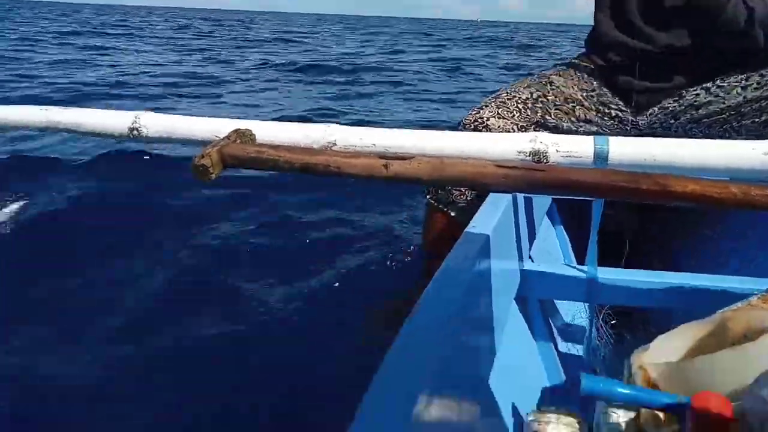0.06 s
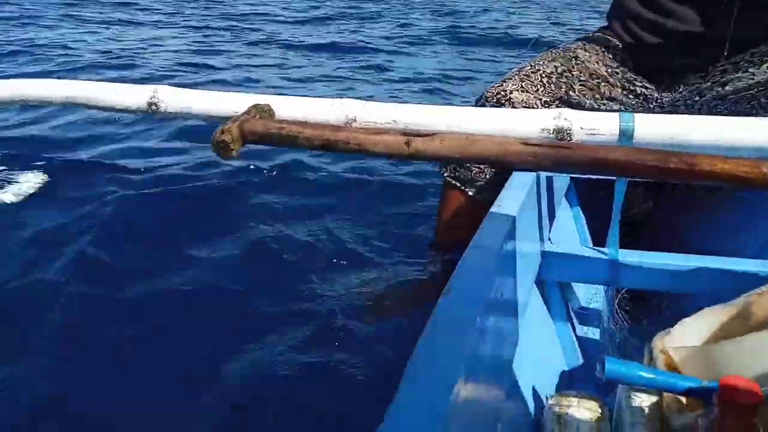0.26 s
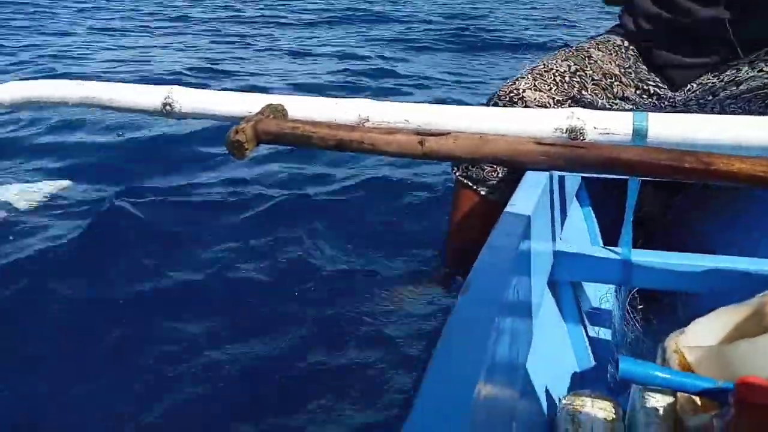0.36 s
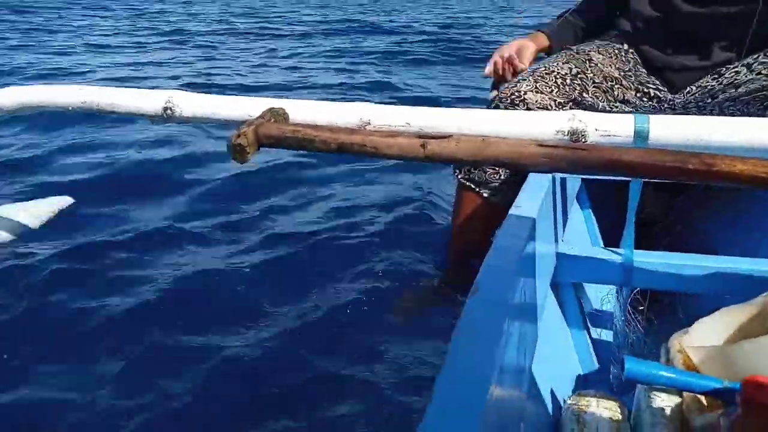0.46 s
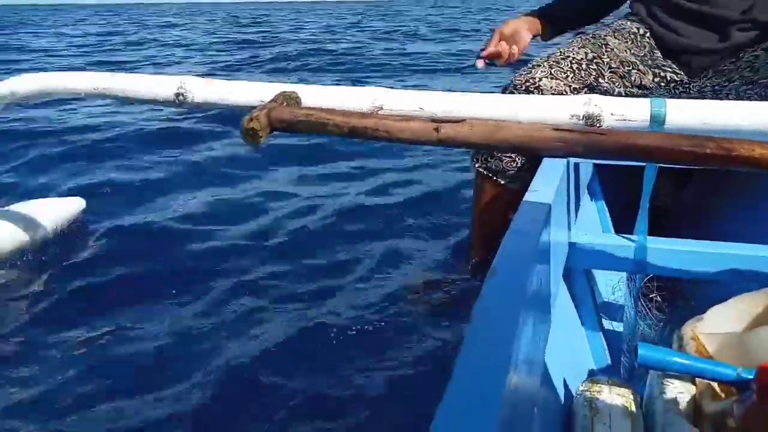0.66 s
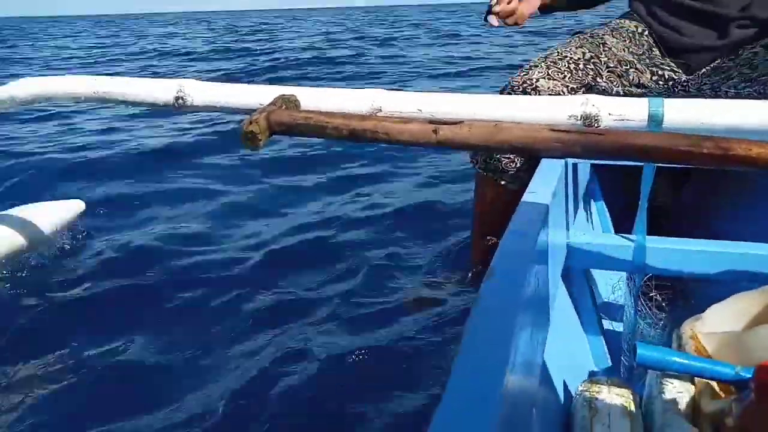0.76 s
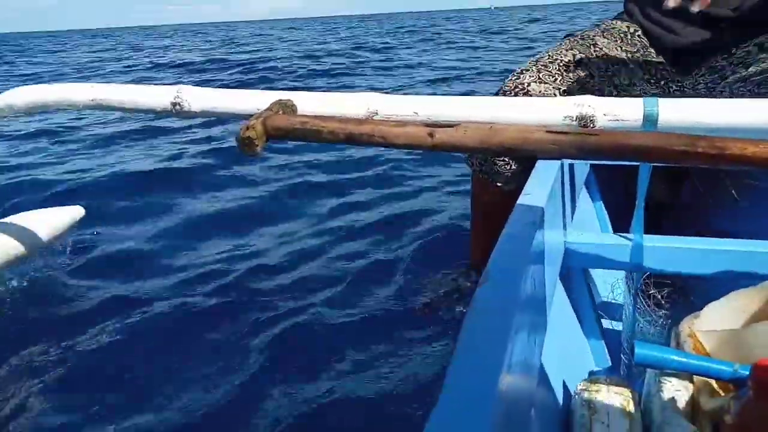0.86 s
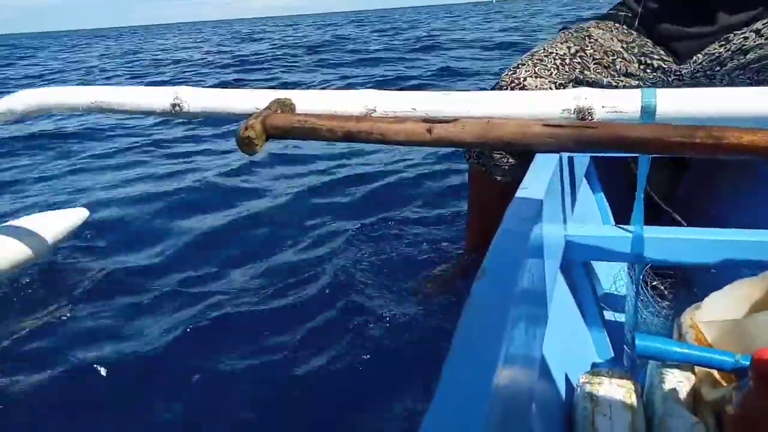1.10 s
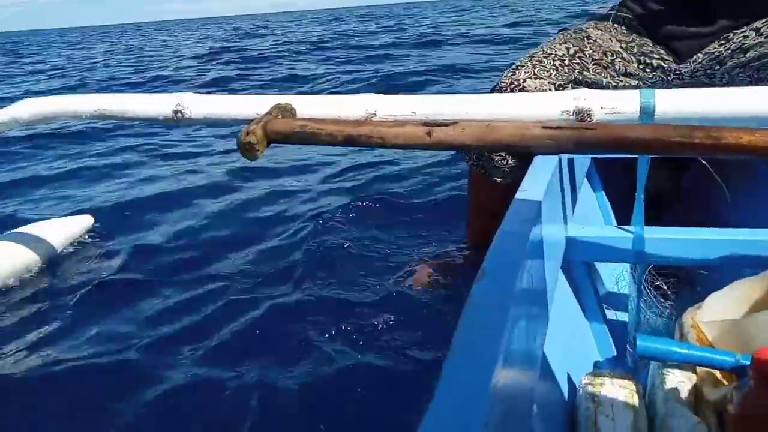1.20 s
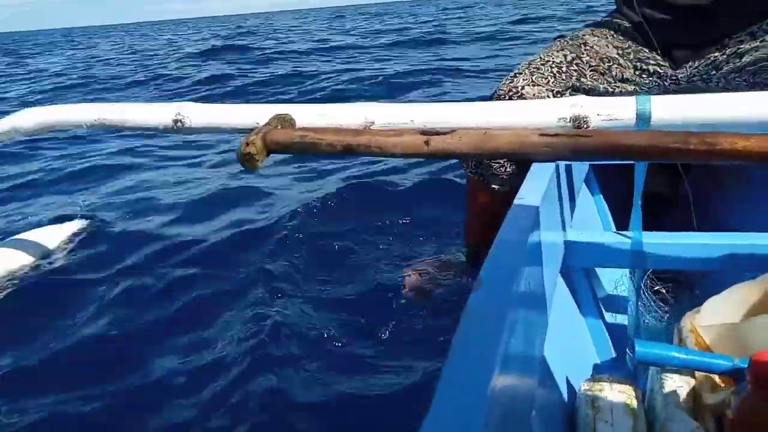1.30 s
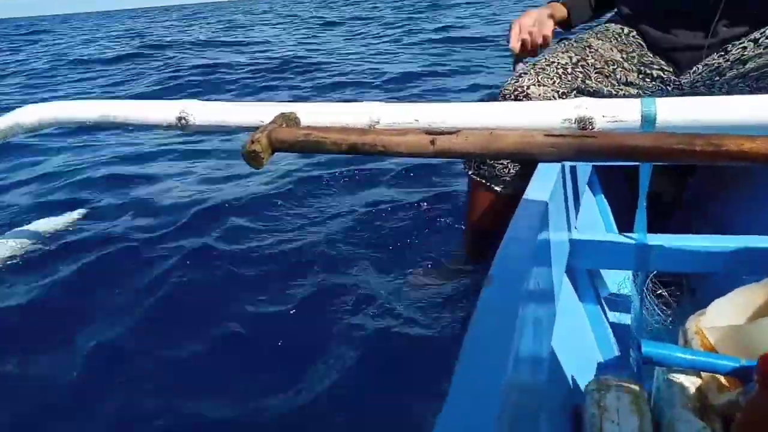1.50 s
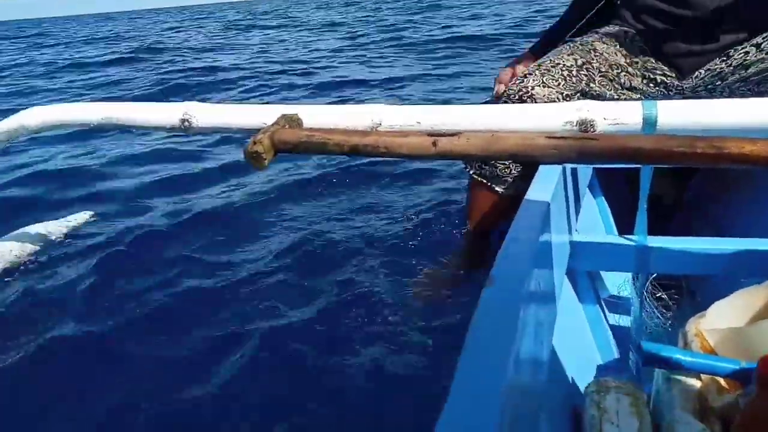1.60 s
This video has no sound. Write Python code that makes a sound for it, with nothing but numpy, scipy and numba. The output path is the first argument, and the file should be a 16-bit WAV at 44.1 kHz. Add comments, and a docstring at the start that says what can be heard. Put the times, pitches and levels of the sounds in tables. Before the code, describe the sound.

Water laps and splashes against a small boat's hull, with bubbly glugs, then a crisp spatter

```python
"""Wavelets against a small boat

Wavelets lap and splash against the hull of a small open boat at sea, heard on a phone close above the water.
Trapped air pops as short rising bubbles, drops tick on hull and water: all are short, fading sine waves.
Crowds of them make the spray and the churning water; filtered noise makes the fine hiss and the breeze rumble."""
import sys
import numpy as np
from scipy import signal
from scipy.fft import rfft, irfft
from scipy.io import wavfile
from scipy.ndimage import uniform_filter1d
from numba import njit

SR = 44100
rng = np.random.default_rng(int(sys.argv[2]) if len(sys.argv) > 2 else 0)


def waveform_to_disk(signal):
    """Save audio, clipped to [-1, 1], as 16-bit WAV at the path in sys.argv[1]."""
    frames = np.transpose(np.atleast_2d(signal))
    scaled = np.clip(frames, -1, 1) * 32767
    samples = np.round(scaled).astype(np.int16)
    wavfile.write(sys.argv[1], SR, samples)


def invert_db(level):
    """Linear amplitude ratio for a level in decibels (20 dB per decade), elementwise."""
    return 10 ** (np.asarray(level, dtype=float) / 20)


N = 72765  # length in samples

# bubbles: pitch rise per cycle as a share of the starting pitch, and swelling time in cycles
RISE_PER_CYCLE, ONSET_CYCLES = 0.0075, 1.26


def glugs():
    """Large bubbles under the hull: the more air is trapped, the lower the note."""
    # single large bubbles: t/s, level/dB, starting f/Hz
    large = [(0.175, -32, 820), (0.282, -27, 713), (0.304, -23, 784), (0.399, -26.5, 710),
             (0.415, -23.5, 677), (0.424, -23.5, 688), (0.48, -30, 805), (0.607, -21, 462),
             (0.634, -33, 450), (0.65, -9, 717), (0.662, -9, 602), (0.709, -8.5, 782), (0.728, -13, 726),
             (0.794, -16, 737), (0.864, -24, 812), (1.198, -24, 1325), (1.225, -27, 452)]
    return bubbles(large, 11.9)


def plinks():
    """Small bubbles at the surface, which ring higher than the large ones."""
    # single small bubbles: t/s, level/dB, starting f/Hz
    small = [(0.0898, -34, 1340), (0.138, -36.5, 2130), (0.179, -31, 1480), (0.2324, -23.5, 1366),
             (0.2373, -17, 2164), (0.2455, -20.5, 2030), (0.2775, -25.5, 2080), (0.3192, -21.5, 1420),
             (0.38, -18, 1660), (0.419, -20, 2190), (0.4356, -22, 1980), (0.4672, -29.5, 3430),
             (0.474, -24.5, 2000), (0.5142, -27.5, 1970), (0.575, -33, 4670), (0.5933, -17, 1682),
             (0.609, -14, 2287), (0.6339, -16.5, 2350), (0.6474, -17.5, 1344), (0.6704, -14, 1413),
             (0.6978, -17.5, 3360), (0.7113, -12.5, 2170), (0.723, -12.5, 2260), (0.7881, -21, 1520),
             (0.7982, -33, 5900), (1.1378, -18.5, 1900), (1.188, -15, 2210), (1.268, -20.5, 2590),
             (1.281, -22.5, 2400), (1.334, -39.5, 3300), (1.371, -39, 2820), (1.3557, -29.5, 1230),
             (1.3893, -40, 1190), (1.4706, -35.5, 4030), (1.5318, -24, 3470), (1.5344, -22, 3480),
             (1.543, -20, 2784), (1.5694, -28, 3180), (1.5918, -26.5, 1382)]
    return bubbles(small, 15.5)


def bubbles(table, cycles):
    """Single bubbles that stand out: each rings briefly while its pitch rises."""
    at, db, hz = np.array(table, float).T.copy()
    return ring(at, invert_db(db), hz, cycles + 0 * at, RISE_PER_CYCLE, ONSET_CYCLES)


def ticks():
    """Abrupt impacts of drops, barely ringing, each with a snap in the treble."""
    # drops that strike hull or water: t/s, level/dB, treble snap level/dB
    impacts = [(0.3056, -22, -50), (0.4305, -20, -49), (0.5937, -18, -27), (0.6351, -26, -26),
               (0.8558, -16, -33), (0.9678, -12, -22), (0.9695, -9, -21), (0.9729, -8, -18),
               (0.9791, -3, -9), (0.9831, -3, -15), (0.9918, -6, -19), (0.9967, -8, -22), (1.0025, -7, -17),
               (1.0046, 0, -5), (1.0186, -4, -12), (1.0211, -11, -21), (1.0436, -15, -17),
               (1.0481, -11, -14), (1.0552, -13, -27), (1.057, -12, -25), (1.0638, -13, -23),
               (1.0678, -11, -20), (1.089, -20, -31), (1.1118, -14, -28), (1.1379, -20, -22),
               (1.2038, -14, -30), (1.2077, -12, -18), (1.2455, -25, -31), (1.2569, -13, -35),
               (1.2651, -14, -25), (1.2763, -17, -24), (1.3091, -46, -37)]
    tick_hz, tick_cycles = 3660, 5.35
    snap_hz, snap_cycles = 8200, 9.5
    at, db, snap_db = np.array(impacts, float).T.copy()
    same = 0 * at  # added to a number, gives one copy per drop
    tick = ring(at, invert_db(db), tick_hz + same, tick_cycles + same, 0., 0.45)
    snap = ring(at, invert_db(snap_db), snap_hz + same, snap_cycles + same, 0., .9)
    return tick + snap


def spray():
    """Drops crackling down after each slap, with a finer mist above them whose smallest drops merge into hiss."""
    # showers of spray: start t/s, hold t/s, drop level/dB, fine mist level/dB
    showers = [(.01, 0.01, -48, -51.5), (0.133, 0.088, -50, -72), (0.229, 0.0096, -29, -55.5),
               (0.26, 0.091, -42.5, -58), (0.368, 0.078, -40, -60.5), (0.452, 0.032, -43.5, -57.5),
               (0.506, 0.0044, -40, -55), (0.536, 0.034, -42, -60), (0.586, 0.025, -37, -45),
               (0.639, .16, -29.5, -47.5), (0.826, 0.15, -39, -54.5), (0.876, 0.015, -36, -45),
               (0.958, 0.056, -24, -32), (1.017, 0.051, -31, -36), (1.073, 0.067, -35.5, -46),
               (1.166, 0.027, -31.5, -38.5), (1.191, 0.011, -26.5, -34), (1.224, 0.018, -40.5, -63),
               (1.253, 0.0092, -27, -38.5), (1.302, 0.096, -53, -61), (1.529, 0.11, -50.5, -61.5)]
    hiss_hz, hiss_db = 8400, -6.5  # lower edge; gain relative to the mist's
    start, hold, db, mist_db = np.array(showers, float).T
    drop_gain = bursts(start, hold, db)
    mist_gain = bursts(start, hold, mist_db, lull_db=-68)
    drops = swarm(1600, drop_gain, lambda t: 2766, octaves=0.43, cycles=8.8,
                  scatter_db=1, rise=0., onset=0.44)
    mist = swarm(4600, mist_gain, lambda t: 6600, octaves=0.3, cycles=9.9,
                 scatter_db=2.5, rise=0., onset=1.5)
    high_pass = signal.butter(2, hiss_hz, "high", fs=SR, output="sos")
    hiss = signal.sosfilt(high_pass, rng.standard_normal(N))
    return drops + mist + invert_db(hiss_db) * mist_gain * hiss


def churn():
    """Many overlapping bubbles where the water folds under the hull."""
    # folds of water: start t/s, hold t/s, level/dB, middle bubble f/Hz
    folds = [(0, 0.13, -52, 918), (0.15, 0.095, -48.5, 1210), (0.217, 0.06, -40, 1352),
             (0.27, 0.069, -37.5, 950), (0.338, 0.052, -40.5, 1114), (0.389, 0.051, -41, 746),
             (0.464, 0.037, -39.5, 1180), (0.6, 0.09, -30, 674), (0.649, 0.16, -28.5, 785),
             (0.756, 0.031, -32, 1262), (0.814, 0.13, -38, 1240), (0.968, 0.088, -37, 1530),
             (1.024, 0.13, -39, 1413), (1.177, 0.032, -33.5, 1049), (1.22, 0.081, -51, 986),
             (1.31, 0.068, -53.5, 1510), (1.612, 0.094, -49.5, 1440)]
    start, hold, db, hz = np.array(folds, float).T
    gain = bursts(start, hold, db, lull_db=-67)
    return swarm(800, gain, stepped(start, hz), octaves=0.553, cycles=9,
                 scatter_db=2.5, rise=RISE_PER_CYCLE, onset=ONSET_CYCLES)


def breeze():
    """Low rumble of air on the microphone: filtered noise, wavering, with a few stronger puffs."""
    # tone of the rumble: f/Hz, level/dB
    rumble = [(20, -51), (45, -13.5), (90, -2), (160, 4), (280, 0), (380, -10.5), (700, -34), (4000, -58)]
    # puffs of air on the microphone: t/s, level over the breeze/dB
    stronger = [(0.033, 7.5), (0.541, 8), (0.778, 6.5), (0.851, 4.5), (1.008, 11)]
    breeze_db, gust_db = -50, 2.6  # base level; size of the wavering
    gusts_per_s, puff_s = 22, 0.028
    k = int(SR / gusts_per_s)
    # random levels joined by straight slopes
    gust = uniform_filter1d(np.repeat(rng.standard_normal(100), k), k)[:N]
    t = np.arange(N) / SR
    puffs = sum(db * np.exp(-((t - s) / puff_s) ** 2) for s, db in stronger)
    air = colour(rng.standard_normal(N), rumble)
    return air / air.std() * invert_db(breeze_db + gust_db * gust + puffs)


@njit
def ring(at, size, hz, cycles, rise, onset):
    """Damped sines that swell for `onset` cycles, fall by 1/e in cycles / 3 and glide up by `rise`."""
    y = np.zeros(N)
    for k in range(len(at)):
        i, phase, f = int(at[k] * SR), 0., hz[k]  # phase counts cycles
        while i < N and phase < 3 * cycles[k]:
            swell = min(1., (phase + .05) / onset)
            fade = np.exp(-3 * phase / cycles[k])
            y[i] += size[k] * swell * fade * np.sin(2 * np.pi * phase)
            phase += min(f * (1 + rise * phase), .45 * SR) / SR
            i += 1
    return y


def swarm(per_s, gain, pitch, octaves, cycles, scatter_db, rise, onset):
    """A random crowd of bubbles or drops, louder and softer in clumps, each sized by the gain at its birth."""
    lowest_hz, highest_hz = 397, 15000
    clumps_per_s, clump_db = 45, 1.6
    u = rng.random((8000, 3))
    at = np.cumsum(-np.log(u[:, 0])) / per_s  # random waits between births
    detune = 2 ** (octaves * rng.standard_normal(len(at)))
    hz = np.clip(pitch(at) * detune, lowest_hz, highest_hz)
    # a few are much louder than the rest; the sign is random
    size = invert_db(scatter_db * np.minimum(-np.log(u[:, 1]), 3)) * np.sign(u[:, 2] - .5)
    clump = np.minimum(at * clumps_per_s, 3999).astype(int)
    size = size * invert_db(clump_db * rng.standard_normal(4000)[clump])
    lengths = cycles * (.5 + u[:, 2])
    # ring once at an even gain to find the crowd's own strength
    spread = ring(at, size, hz, lengths, rise, onset).std()
    birth = np.minimum((at * SR).astype(int), N - 1)
    return ring(at, size * gain[birth] / spread, hz, lengths, rise, onset)


def bursts(start, hold, db, lull_db=-57.5):
    """Gain over time: each burst rises fast, holds and dies away, over a faint lull."""
    attack_s, release_s = 0.0082, 0.013
    t = np.arange(N) / SR - start[:, None]
    rise = np.clip(t / attack_s, 0, 1)
    fall = np.exp(-np.maximum(t - hold[:, None], 0) / release_s)
    loudest = (invert_db(db)[:, None] * rise * fall).max(axis=0)
    return np.maximum(loudest, invert_db(lull_db))


def stepped(start, value):
    """The value of the burst that began last."""
    return lambda t: value[np.maximum(np.searchsorted(start, t) - 1, 0)]


def colour(x, points):
    """Filter through (Hz, dB) points that responds only after its input, never before."""
    hz, db = np.array(points, float).T
    log_hz = np.log(np.linspace(1, SR / 2, 4097))
    cep = irfft(np.interp(log_hz, np.log(hz), db) * np.log(10) / 20)
    # fold the backward half of the cepstrum onto the forward half
    cep[1:4096] *= 2
    cep[4097:] = 0
    return signal.fftconvolve(x, irfft(np.exp(rfft(cep))))[:N]


def scene():
    """Small water sources radiate little bass; the hull returns a few short echoes."""
    # echoes from the hull: delay t/s, level/dB
    hull = [(.0032, -19), (.0071, -19.5), (.013, -13.5)]
    water = glugs() + plinks() + ticks() + spray() + churn()
    no_bass = signal.butter(4, 317, "high", fs=SR, output="sos")  # Hz
    water = signal.sosfilt(no_bass, water)
    echoes = sum(invert_db(db) * np.pad(water, (int(s * SR), 0))[:N] for s, db in hull)
    return (water + echoes + breeze())[None]


def roll_off(x):
    """The treble ends steeply here."""
    return signal.sosfilt(signal.butter(12, 15830, fs=SR, output="sos"), x)


def record(dry):
    """The phone microphone peaks in the low treble and drops above it."""
    # microphone response: f/Hz, level/dB
    response = [(30, 2), (300, -5), (2500, -2.5), (3600, 3), (4200, -1), (5000, -10.5), (6500, -10),
                (11000, -16), (16000, -12.5)]
    mix = colour(dry[0], response)[None]
    return roll_off(mix)


dry = scene()
out = record(dry)
waveform_to_disk(out)
```